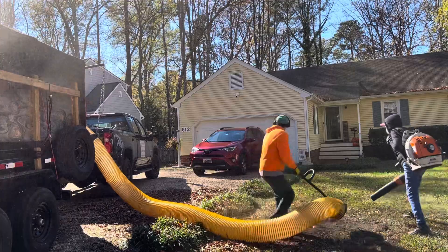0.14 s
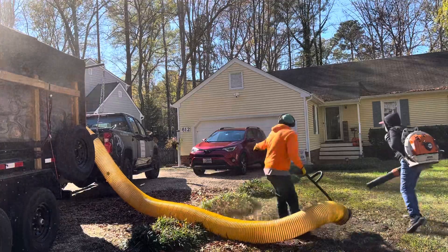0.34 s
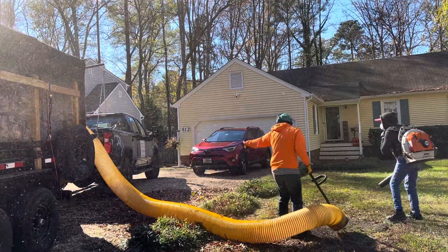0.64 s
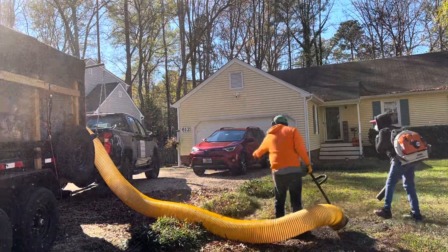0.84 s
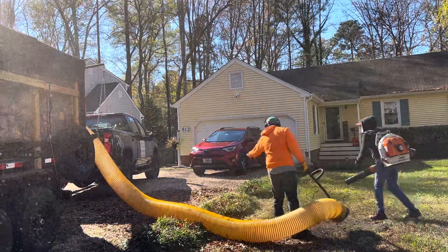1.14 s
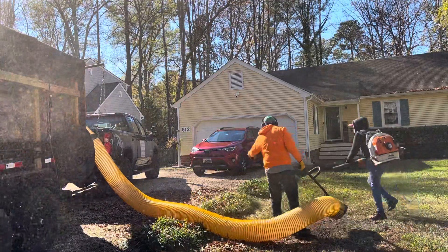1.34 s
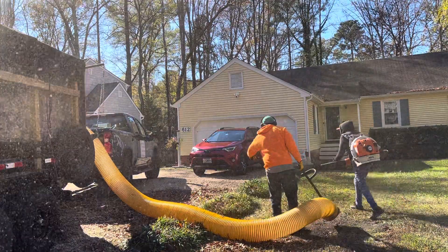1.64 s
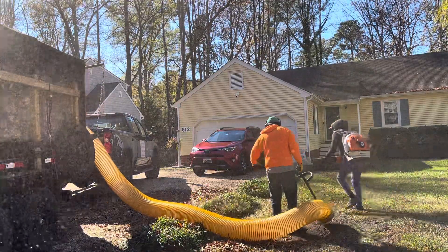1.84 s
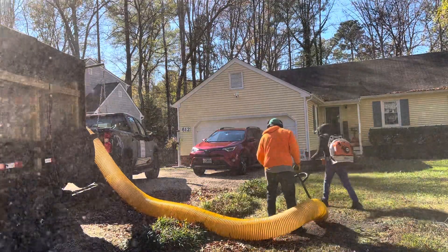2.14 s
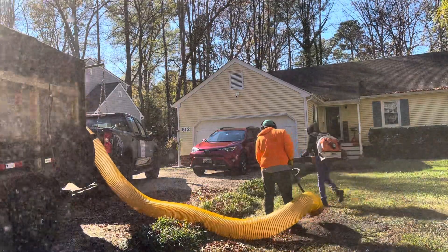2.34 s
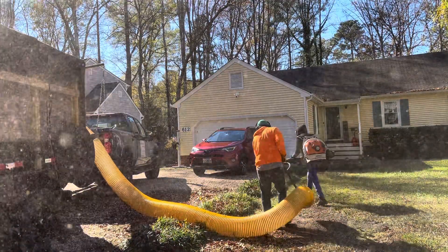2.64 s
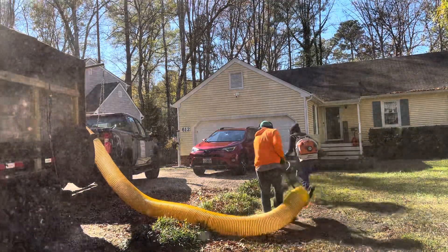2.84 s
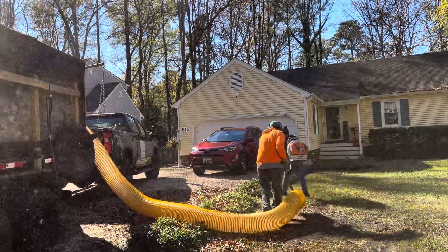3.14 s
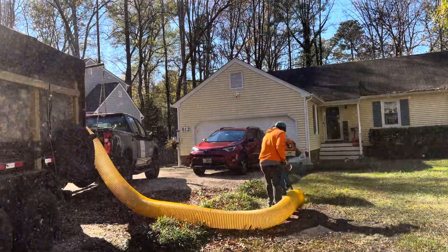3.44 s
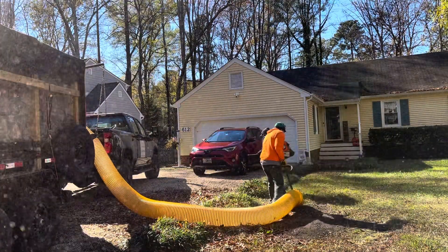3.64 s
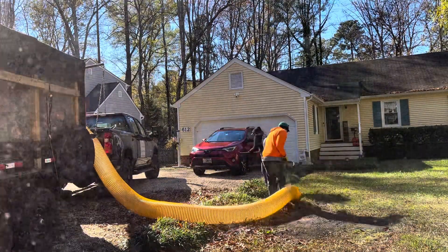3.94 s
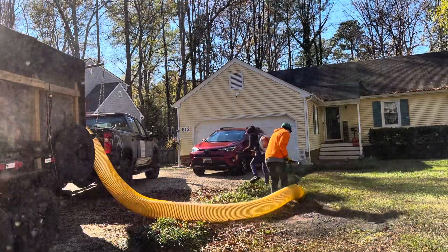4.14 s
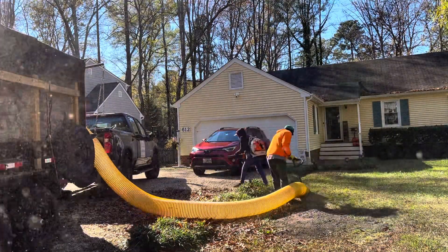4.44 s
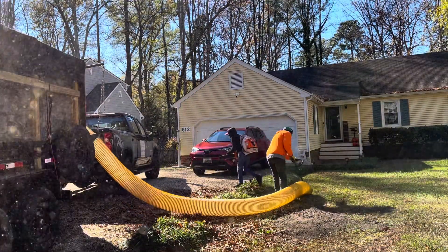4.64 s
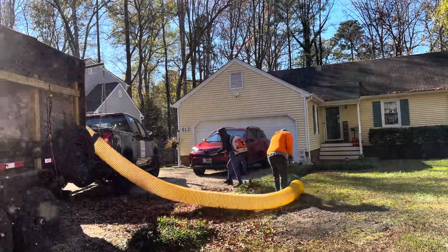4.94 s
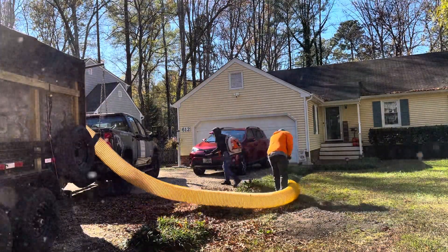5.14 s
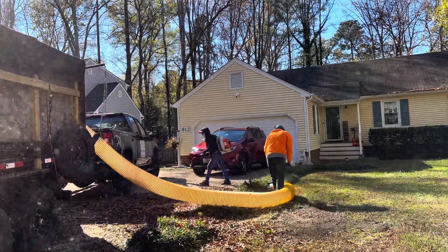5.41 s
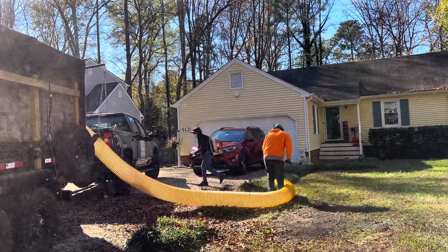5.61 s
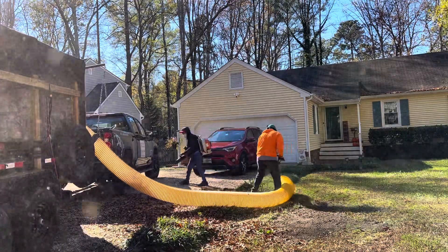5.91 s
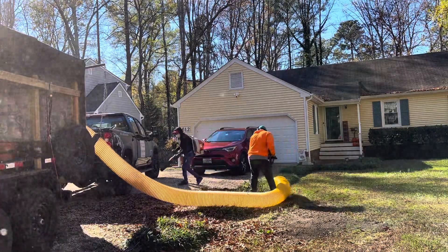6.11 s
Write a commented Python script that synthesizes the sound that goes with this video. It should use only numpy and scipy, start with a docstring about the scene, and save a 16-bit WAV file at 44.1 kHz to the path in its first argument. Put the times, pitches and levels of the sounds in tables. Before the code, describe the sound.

Outdoors in a yard, heard through two close microphone ports. A trailer leaf vacuum runs throughout, stronger on the left: a nearly constant low hum near 233 Hz with wavering overtones, uneven twin-cylinder engine throb and a wide roar of air. From 0 s a nearby backpack blower buzzes raspily with hiss and a high fan whine, peaking around 0.15 s, easing, then revving again around 0.8-0.9 s. From about 1.1 s it winds down; a faint whine briefly rises and falls near 1.6 s. By 2 s it is a soft, ticking idle at roughly 23 pops per second, slowing and receding after 3.6 s. The vacuum's hum becomes more prominent from about 1.5 s, swelling and dipping. Leaf rush, strong at first, thins, then returns from 3.7 s. Short bright rustles occur near 0.3, 1.2, 4.3, 4.7 and 5.4 s, with a sharper cluster around 6.1 s. The drone continues to the end at 6.3 s.

```python
"""A steady drone and a rush of air come first, stronger on the left, with a small engine revving close by.
The drone is a trailer leaf vacuum: sines for its four-blade impeller and twin-cylinder engine, shaped noise
for air roar and for leaves rushing up the hose, and short bright rustles for caught twigs and clumps.
The small engine is a backpack blower: each firing rings its muffler and outlet, with jet hiss and fan whine.
It is revved twice, drops to a ticking idle and walks away. Outdoors, two microphone ports close together."""
import sys
import numpy as np
from scipy import signal
from scipy.fft import rfft, irfft, next_fast_len
from scipy.io import wavfile
from scipy.ndimage import uniform_filter1d

SR = 44100
rng = np.random.default_rng(int(sys.argv[2]) if len(sys.argv) > 2 else 0)


def master_out(mix):
    """Clip the mix to full scale and print it as 16-bit PCM to the path in sys.argv[1]."""
    frames = np.transpose(np.atleast_2d(mix))
    ceiling = np.clip(frames, -1, 1)
    pcm = np.round(ceiling * 32767).astype(np.int16)
    wavfile.write(sys.argv[1], SR, pcm)


def linear_from_db(decibels):
    """Turn decibels (scalar or array-like) into linear amplitude factors; 0 gives 1."""
    return 10 ** (np.asarray(decibels, float) / 20)


N = 276494  # samples, about 6.27 s

# how much louder the left channel is than the right: pitch_hz [Hz], left_over_right_db [dB]
LEFT_OVER_RIGHT = [(60, 3), (110, -4.5), (200, 5.5), (380, 3.5), (700, 12), (1290, 3.5), (2380, 6.5),
                   (4400, 21.5), (6500, 31), (7500, 1)]
# phase of left ahead of right; above 7 kHz it sets the stereo image of the finished sound,
# not the spacing of the ports: pitch_hz [Hz], left_lead_rad [rad]
LEFT_LEAD = [(60, .02), (300, .7), (600, 1.3), (800, .3), (950, -1.05), (1210, .55), (2800, .02),
             (3700, .6), (4400, .02), (7000, 0), (7650, .1), (9300, 3.1), (10800, 3.15), (12700, 6.28),
             (13900, 6.3), (15500, 8.8)]
# colour of leaves brushing past: pitch_hz [Hz], relative_level_db [dB per Hz]
LEAF_COLOUR = [(1200, -6.5), (2200, -5.5), (2900, -1.5), (3500, -4), (4150, -1.5), (5000, -4), (6150, -2),
               (6950, -7), (9000, -3), (12000, -11), (16000, -14.5)]


def rms_one(x):
    """Scale to rms 1."""
    return x / np.sqrt(np.mean(x ** 2) + 1e-20)


def in_time(rows):
    """Join the points of a table by straight lines: each column gets one value per sample."""
    s, *columns = np.transpose(rows)
    return [np.interp(np.arange(N) / SR, s, c) for c in columns]


def at_hz(points, hz):
    """Read a spectrum on a log-frequency axis."""
    point_hz, value = np.transpose(points)
    return np.interp(np.log(hz), np.log(point_hz), value)


def drift(rate_hz):
    """Slow random wandering of spread 1: low-passed noise, made at every 40th sample."""
    r = np.exp(-80 * np.pi * rate_hz / SR)
    noise = rng.standard_normal(N // 40 + 4002)
    slow = signal.lfilter([1], [1, -2 * r, r * r], noise)[4000:]  # skip the filter's start
    return np.interp(np.arange(N) / 40, np.arange(len(slow)), rms_one(slow - slow.mean()))


def resonance(x, hz, width_hz):
    """Two-pole peak of gain 1, like one ringing mode of a metal part."""
    r = np.exp(-np.pi * width_hz / SR)
    top = (1 - r * r) / 2
    return signal.lfilter([top, 0, -top], [1, -2 * r * np.cos(2 * np.pi * hz / SR), r * r], x)


def body(drive, modes, firing, varies_db):
    """Steep resonances side by side, each struck anew by every firing; level slowly evened out to rms 1."""
    luck = linear_from_db(varies_db * rng.standard_normal((1000, len(modes))))
    out = 0
    for k, (hz, width_hz, db) in enumerate(modes):
        once = resonance(drive * luck[firing, k], hz, width_hz)
        out = out + linear_from_db(db) * (-1) ** k * resonance(once, hz, width_hz)
    return out / np.sqrt(uniform_filter1d(np.mean(out ** 2, axis=0), size=16384))


def pair(turns, db, pan_db, lead):
    """A sine of given rms in both channels, louder on the left by pan_db and ahead there by lead [rad]."""
    side = np.array([[.5], [-.5]])
    return np.sqrt(2) * linear_from_db(db + side * pan_db) * np.sin(2 * np.pi * turns + side * lead)


def air_noise(spectrum, unlike, leftness, patchy_db, flicker_hz):
    """Stereo air noise of rms 1: channels partly alike and offset, each octave flickering partly alone."""
    # how alike the two channels are, before the power "unlike"; above 7 kHz it sets the stereo image
    # of the finished sound, not the spacing of the ports: pitch_hz [Hz], likeness [0-1]
    likeness = [(60, .97), (130, .93), (290, .85), (640, .6), (1000, .8), (1900, .75), (3100, .68),
                (5800, .42), (6900, .5), (7200, .94), (9500, .93), (12300, .95)]
    size = next_fast_len(N)
    hz = np.maximum(np.arange(size // 2 + 1) * SR / size, 10)
    shared, left, right = rfft(rng.standard_normal((3, size)))
    alike = np.clip(at_hz(likeness, hz), 0, 1) ** unlike
    both = np.sqrt(alike) * shared + np.sqrt(1 - alike) * np.array([left, right])
    # half of the balance and lead on the left channel, the inverse on the right
    half = linear_from_db(leftness * at_hz(LEFT_OVER_RIGHT, hz) / 2) * np.exp(.5j * at_hz(LEFT_LEAD, hz))
    both = both * linear_from_db(at_hz(spectrum, hz)) * [half, 1 / half]
    out, together = 0, drift(flicker_hz)
    for octave in range(9):
        # overlapping octave bands; the lowest and highest stay open outward
        away = np.clip(np.log2(hz / 50) - octave, -(octave > 0), int(octave < 8))
        share = np.cos(np.pi / 2 * away) ** 2
        flicker_db = patchy_db * (together + 1.3 * drift(flicker_hz))
        out = out + irfft(both * share, size)[:, :N] * linear_from_db(flicker_db)
    return rms_one(out)


def impeller():
    """Blades passing per second, and their running count; eight blades pass in one four-stroke engine cycle."""
    # nearly steady speed: time_s [s], blade_rate_hz [Hz]
    blade_rate = [(0.2, 233.45), (0.65, 233.33), (1.1, 233.77), (1.55, 233.69), (2.0, 232.52),
                  (2.45, 234.26), (2.9, 233.79), (3.35, 233.94), (3.8, 233.15), (4.25, 233.7),
                  (4.7, 233.95), (5.15, 232.93), (5.6, 234.43), (6.05, 232.83)]
    blade_hz, = in_time(blade_rate)
    return blade_hz, np.cumsum(blade_hz) / SR


def vacuum_air(turns):
    """Roar and leaf rush throb with the blades and the two cylinders' uneven firing, the rush less."""
    # colour of the air roar: pitch_hz [Hz], relative_level_db [dB per Hz]
    roar_colour = [(25, -12), (45, -6), (65, 2.5), (120, 2), (200, 0.5), (300, 2), (550, -1), (700, -8),
                   (1000, -10), (1350, -10.5), (1520, -19), (1900, -19), (2800, -27.5), (6000, -51)]
    # leaves rushing up the hose: time_s [s], level_db [dB]
    leaf_rush = [(0, -41.5), (.6, -49), (1.45, -53), (1.9, -52.5), (2.3, -50), (2.7, -52), (3.45, -52),
                 (3.68, -47.5), (4.0, -45.5), (4.6, -47), (6.04, -47.5), (6.27, -44.5)]
    # the roar sinks slowly to its lowest, then regains a little
    start_db, sink_db_per_s, sinks_until_s, regain_db_per_s = -28, 1.04, 3.18, 0.5
    since = np.arange(N) / SR - sinks_until_s
    roar_db = start_db - sink_db_per_s * (sinks_until_s + since.clip(max=0))
    roar_db += regain_db_per_s * since.clip(0)
    rush_db = in_time(leaf_rush)[0] + 0.6 * drift(4)  # with random gusts
    cycle = 2 * np.pi * turns / 8
    throb = 0.064 * np.cos(2 * cycle) + 0.054 * np.cos(3 * cycle) + 0.02 * np.cos(8 * cycle)
    roar = air_noise(roar_colour, unlike=1, leftness=1.0, patchy_db=0.64, flicker_hz=23)
    rush = air_noise(LEAF_COLOUR, unlike=1.0, leftness=0.31, patchy_db=0.6, flicker_hz=25.2)
    return linear_from_db(roar_db) * (1 + throb) * roar + linear_from_db(rush_db) * (1 + 0.69 * throb) * rush


def leaf_knocks():
    """Twigs and leaf clumps are caught: each gives a short burst of bright noise that dies away."""
    # bright rustles: start_s [s], level_db [dB, before the onset is softened]
    catches = [(0.311, -47), (1.19, -42.5), (4.29, -45.5), (4.66, -44.5), (5.44, -42), (6.06, -51),
               (6.156, -39.5), (6.185, -46.5)]
    clicks = np.full(N, 1e-18)
    for start_s, db in catches:
        clicks[round(start_s * SR)] = linear_from_db(db)
    fade = np.exp(-1 / (0.0041 * SR))  # dies away with a time constant of 4.1 ms
    envelope = uniform_filter1d(signal.lfilter([1], [1, -fade], clicks), size=60)
    return envelope * air_noise(LEAF_COLOUR, unlike=.7, leftness=0.93, patchy_db=1.0, flicker_hz=30)


def blower_firings(per_s):
    """Each firing gives one pop and a fading puff of gas, of slightly random strength."""
    turns = np.cumsum(per_s) / SR
    turns -= turns[round(2.429 * SR)]  # one idle firing falls at 2.429 s
    firing = np.floor(turns + .003 * drift(15))  # slightly uneven timing
    number = (firing - firing.min()).astype(int)
    strength = linear_from_db(1.4 * rng.standard_normal(1000))[number]
    pops = strength * np.diff(firing, prepend=firing[0]).clip(0)
    # a weaker second puff comes on the idle turn of the crank
    puff = np.exp(-(turns % 1) / 0.26) + 0.062 * np.exp(-((turns + .5) % 1) / 0.1)
    return turns, number, pops, uniform_filter1d(strength * puff, size=130)


def blower_exhaust(exhaust_db, doublings, number, pops, puff_noise):
    """Pops and puffs ring the muffler and shell, and more thinly the tinny exhaust outlet."""
    # muffler and shell: pitch_hz [Hz], width_hz [Hz], relative_level_db [dB]
    muffler = [(106, 120, 2.5), (204, 280, -1.5), (322, 240, 1.5), (403, 73, 8), (523, 95, 5.5),
               (800, 27, -3), (930, 61, -5), (1750, 290, -21)]
    # exhaust outlet: pitch_hz [Hz], width_hz [Hz], relative_level_db [dB]
    outlet = [(2200, 390, 3.5), (3110, 220, -3.5), (3400, 270, -1), (3930, 300, 1), (4340, 350, -3.5),
              (5220, 570, -7)]
    # at idle the outlet ticks clearly until the blower turns away: time_s [s], least_level_db [dB]
    idle_tick = [(1.25, -63), (1.75, -57.5), (2.25, -53), (3.1, -55), (3.6, -57), (3.9, -57)]
    tick_db = np.maximum(-55 + 18 * doublings, in_time(idle_tick)[0])  # 18 dB per doubling of speed
    shared, left, right = puff_noise
    note = body(110 * pops + [left, right], muffler, number, varies_db=.5)
    ticks = body(12 * pops + 1.4 * shared + [left, right], outlet, number, varies_db=3)
    return linear_from_db(exhaust_db) * note + linear_from_db(tick_db) * ticks * linear_from_db([[1.5], [-1.5]])


def blower_jet(jet_db, open_db, number, puff, puff_noise):
    """Air hiss that swells with each puff, and thin rings of the fan housing."""
    # colour of the hiss as finally heard, with a dip near 10 kHz that need not be the jet's own:
    # pitch_hz [Hz], relative_level_db [dB per Hz]
    hiss_colour = [(400, -8), (1000, -5), (1750, 8), (2800, -8), (3300, -11.5), (4000, -5), (4600, -11),
                   (5400, -4.5), (6200, -14), (6900, -11), (8600, -8.5), (9400, -24.5), (10700, -22),
                   (11500, -15.5), (16000, -23.5)]
    # thin rings of the fan housing: pitch_hz [Hz], width_hz [Hz], relative_level_db [dB]
    housing = [(3910, 190, -2.5), (5360, 180, -3), (5660, 110, 1.5)]
    # their joint level: time_s [s], level_db [dB]
    housing_level = [(0, -57), (.2, -56), (.3, -66), (.47, -52), (.85, -58), (.95, -60), (1.1, -66),
                     (1.22, -62), (1.4, -75)]
    # higher ring, strong only with the throttle wide open: pitch_hz [Hz], width_hz [Hz], relative_level_db [dB]
    high_ring = [(6640, 250, 0), (7020, 330, 0.0024)]
    shared, left, right = puff_noise
    hiss = air_noise(hiss_colour, unlike=5.9, leftness=0.26, patchy_db=1.2, flicker_hz=15)
    out = linear_from_db(jet_db) * (1 + puff) * hiss
    out += linear_from_db(in_time(housing_level)[0]) * body(shared + [left, right], housing, number, varies_db=3)
    high_db = -55 + 2.4 * (jet_db - open_db)  # changes 2.4 dB for each dB of jet
    return out + linear_from_db(high_db) * body(1.4 * shared + [left, right], high_ring, number, varies_db=3)


def blower_fan_roar(puff):
    """Roar of the blower's fan: noise that swells later and lasts longer than the jet."""
    # before the puffs add to it: time_s [s], level_db [dB]
    fan_roar = [(0, -47.5), (.14, -42.5), (.24, -46.5), (.45, -58), (.68, -52), (.83, -45.5), (.92, -43),
                (1.1, -49), (1.35, -58), (1.7, -76.5)]
    # pitch_hz [Hz], relative_level_db [dB per Hz]
    fan_colour = [(900, -26.5), (1500, -1.5), (2000, 1), (2500, -2.5), (2900, -14), (5000, -40.5)]
    noise = air_noise(fan_colour, unlike=1.4, leftness=.3, patchy_db=0.4, flicker_hz=26)
    return linear_from_db(in_time(fan_roar)[0]) * (1 + 0.38 * puff) * noise


def blower_whine(turns, doublings, jet_db, open_db):
    """Fan blades, 24 to a firing, whine louder with speed and fade as the throttle closes."""
    whine_db = np.minimum(-41.5 + 58 * doublings, -40.5)  # 58 dB per doubling of speed, up to a top
    whine_db += .45 * (jet_db - open_db).clip(max=0)
    return pair(24 * turns + 0.069 * drift(25), whine_db + 0.62 * drift(22), -1.5, 0.36)


def late_whine():
    """A fainter, slightly wavering whine arches up and down once more."""
    # time_s [s], pitch_hz [Hz], level_db [dB]
    arch = [(1.44, 980, -78), (1.51, 1090, -47), (1.55, 1182, -45), (1.59, 1238, -43), (1.63, 1200, -48),
            (1.66, 1060, -44), (1.72, 966, -75)]
    hz, db = in_time(arch)
    return pair(np.cumsum(hz) / SR + 0.046 * drift(25), db, -1.5, .3)


def brief_rings():
    """Narrow rings in the blower's exhaust note: tones that swell and fade within a few firings."""
    # peak_s [s], pitch_hz [Hz], peak_level_db [dB]
    rings = [(.62, 1070, -43), (.71, 775, -37), (.84, 760, -41), (1.035, 820, -38)]
    t, spread_s = np.arange(N) / SR, .018
    out = 0
    for peak_s, hz, db in rings:
        out = out + pair(hz * t, db, -2.0, .3) * np.exp(-.5 * ((t - peak_s) / spread_s) ** 2)
    return out


def blower():
    """Firing rate drives pops, ticks and whine; the jet answers the throttle a little before the speed does."""
    # time_s [s], firings_per_s [1/s], exhaust_db [dB], jet_db [dB, before the puffs add to it]
    throttle = [(0, 52, -38.5, -40), (.13, 55.3, -25, -36.5), (.165, 54.3, -31, -38.5),
                (.19, 50.5, -36, -41.5), (.235, 46.5, -49, -43.5), (.32, 45.5, -47, -44),
                (.45, 48, -40, -47.5), (.6, 45, -37, -46.5), (.69, 46.7, -45, -42), (.8, 50.8, -30, -39.5),
                (.875, 52.7, -30.5, -40.5), (.91, 52, -40, -43.5), (.945, 48, -35, -46),
                (1.0, 46, -42, -47.5), (1.03, 45.7, -33, -48.5), (1.08, 44.5, -39, -47),
                (1.25, 37, -39, -53.5), (1.5, 31.5, -64, -54), (1.75, 26.5, -42, -76.5),
                (1.92, 24.5, -50, -67), (2.2, 23.7, -47, -68), (3, 22.95, -45, -70.5),
                (3.62, 22.3, -57, -78.5), (3.9, 18, -57, -72.5)]
    per_s, exhaust_db, jet_db = in_time(throttle)
    working_per_s, open_db = 50, -40.5  # working speed; jet level with the throttle open
    doublings = np.log2(per_s / working_per_s)
    turns, number, pops, puff = blower_firings(per_s)
    puff_noise = puff * rng.standard_normal((3, N))  # shared, left, right
    out = blower_exhaust(exhaust_db, doublings, number, pops, puff_noise)
    out += blower_jet(jet_db, open_db, number, puff, puff_noise)
    out += blower_fan_roar(puff)
    out += blower_whine(turns, doublings, jet_db, open_db)
    return out + late_whine() + brief_rings()


def vacuum_exhaust(blade_hz, turns):
    """Engine tones at multiples of the four-stroke cycle rate, wavering at random."""
    # multiple_of_cycle_rate [1], level_db [dB]
    exhaust_lines = [(2, -40), (3, -37), (4, -44.5), (5, -38.5), (6, -43.5), (7, -42), (10, -43),
                     (13, -46.5), (19, -48)]
    out = 0
    for k, db in exhaust_lines:
        hz = k * blade_hz.mean() / 8
        cycle = k * turns / 8 + rng.random() + 0.094 * drift(7.9)
        line_db = db + 2.3 * drift(3.2)
        out = out + pair(cycle, line_db, at_hz(LEFT_OVER_RIGHT, hz), at_hz(LEFT_LEAD, hz))
    return out


def blade_overtones(turns):
    """Multiples of the blade rate: the strongest swell and fade at each port, the upper ones waver by chance."""
    # time_s [s], second_left_db, second_right_db, third_left_db, third_right_db, fourth_left_db [dB]
    swell = [(0.0, -40, -35, -41, -41, -45), (0.35, -34, -40, -36, -61, -42),
             (0.7, -33.5, -41, -35.5, -49.0, -44), (1.0, -35.5, -48, -38, -50, -37.5),
             (1.2, -35.5, -46, -37.5, -41, -44), (1.5, -26.5, -35, -43.5, -44.5, -39.5),
             (1.75, -29.5, -35, -37, -41, -38), (2.05, -36.5, -36.5, -58, -44.5, -39),
             (2.3, -35.5, -36.5, -29, -45, -41), (2.57, -33.5, -37, -38.5, -53, -48),
             (2.78, -37, -51, -37.5, -56, -44), (2.95, -28, -32.5, -30.5, -43, -37),
             (3.33, -36, -39, -37.5, -50, -39), (3.55, -29.5, -34.5, -34, -53, -40.5),
             (3.95, -33, -40.5, -35.5, -52, -42), (4.25, -33, -46, -36.5, -45, -43),
             (4.55, -35.5, -38, -38, -55, -39.5), (4.9, -31.5, -50, -33, -52, -39.5),
             (5.2, -35, -41.5, -36.5, -44, -38.5), (5.5, -29, -38.5, -36, -51, -44.5),
             (5.85, -35.5, -42, -36.5, -51, -37), (6.27, -34.5, -36, -35, -54, -38.5)]
    # all but the third: multiple_of_blade_rate [1], left_lead_rad [rad]
    steady_lead = [(2, 1.15), (4, -.95), (5, .45), (6, 4.5)]
    # the third's lead moves: time_s [s], left_lead_rad [rad]
    third_lead = [(0, .1), (.7, -1.7), (1.2, 1.6), (1.75, 3.3), (2.3, 3.8), (2.6, 1.7), (3.1, 1.5),
                  (3.5, 2.2), (6.27, 2.5)]
    # left minus right: fourth_db, fifth_db, sixth_db [dB]
    upper_pan_db = (20, 12.5, 7.5)
    left2, right2, left3, right3, left4 = in_time(swell)
    fifth_db = -50.5 + 1.1 * drift(1.2)
    sixth_db = -56.5 + 1.1 * drift(1.2)
    # in the order 2, 4, 5, 6, 3
    levels_db = [(left2 + right2) / 2, left4 - upper_pan_db[0] / 2, fifth_db, sixth_db, (left3 + right3) / 2]
    pans_db = [left2 - right2, *upper_pan_db, left3 - right3]
    leads = [*steady_lead, (3, in_time(third_lead)[0])]
    out = 0
    for (k, lead), pan_db, db in zip(leads, pans_db, levels_db):
        out = out + pair(k * turns + 0.07 * drift(1.7), db + 1.49 * drift(5.4), pan_db, lead)
    return out


def blade_drone(turns):
    """The blade tone swells as the microphones move through its ground and wall echoes."""
    # time_s [s], left_db [dB], right_db [dB], left_lead_rad [rad]
    drone = [(0.0, -27, -41, 2), (0.2, -33, -33, 5), (0.5, -33, -29.5, 1.2), (0.8, -31.5, -27.5, 1.4),
             (0.96, -38, -28.5, 2.7), (1.2, -26.5, -38, 0.84), (1.5, -22.5, -29.5, 0.27),
             (1.9, -18.5, -24.5, .35), (2.2, -18, -23.5, 0.47), (2.7, -17.5, -18.5, 0.44),
             (3.3, -22, -23.5, 1.02), (3.8, -17.5, -21.5, 0.63), (4.6, -21, -21.5, 0.77),
             (5.0, -18.5, -22, 0.81), (5.2, -16, -20, 0.75), (5.5, -19, -21.5, 0.8), (5.95, -15, -19, 0.72),
             (6.27, -16, -19, 0.9)]
    left_db, right_db, lead = in_time(drone)
    level_db = (left_db + right_db) / 2 + 0.33 * drift(5.4)
    return pair(turns + 0.006 * drift(5.6), level_db, left_db - right_db, lead)


def scene():
    """Both machines together; one impeller count drives all of the vacuum's tones and its throb."""
    blade_hz, turns = impeller()
    vacuum_tones = vacuum_exhaust(blade_hz, turns) + blade_overtones(turns) + blade_drone(turns)
    return vacuum_air(turns) + leaf_knocks() + blower() + vacuum_tones


def top_cut(x):
    """Nothing passes above the cut-off."""
    return signal.sosfilt(signal.butter(12, 15620, fs=SR, output="sos"), x)


def record(dry):
    """The microphones lose the deepest bass, below about 36 Hz."""
    bass_cut = signal.butter(4, 36, "high", fs=SR, output="sos")
    mix = signal.sosfilt(bass_cut, dry)
    return top_cut(mix)


dry = scene()
out = record(dry)
master_out(out)
```